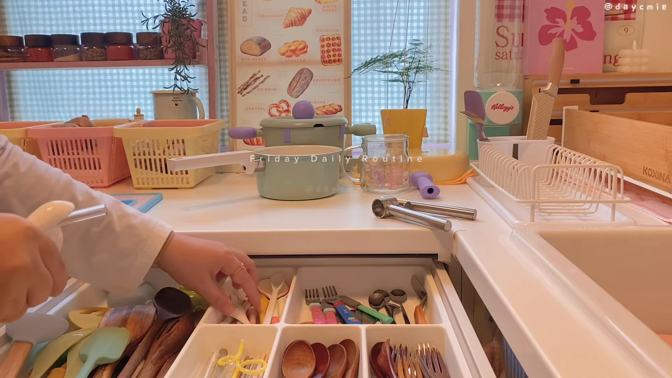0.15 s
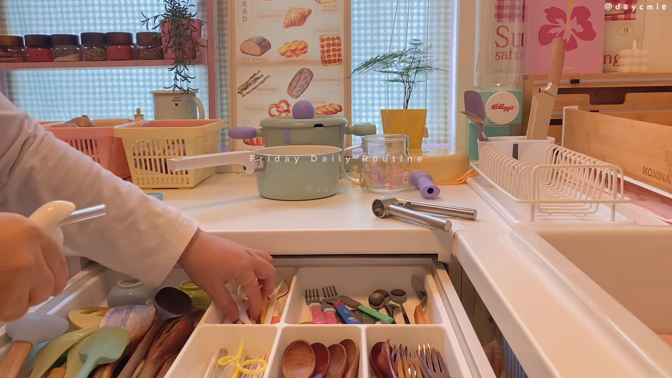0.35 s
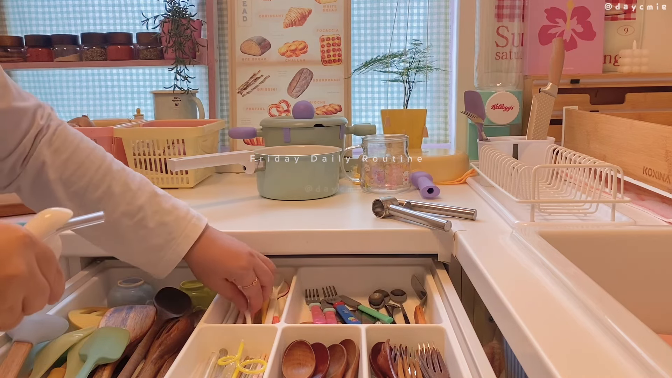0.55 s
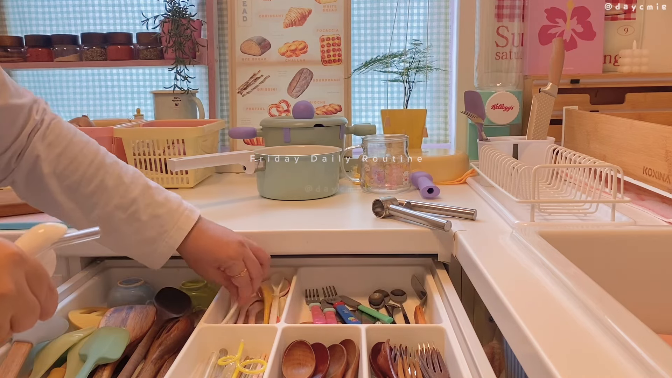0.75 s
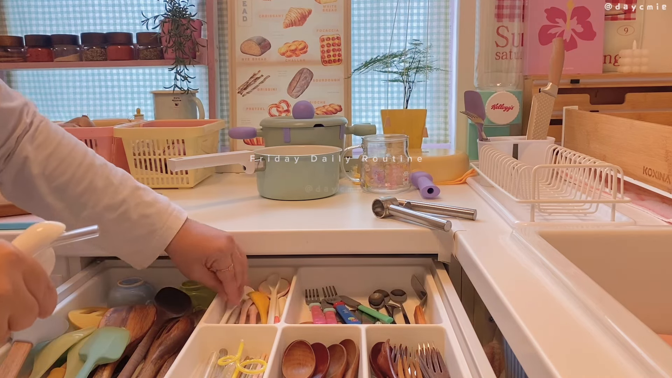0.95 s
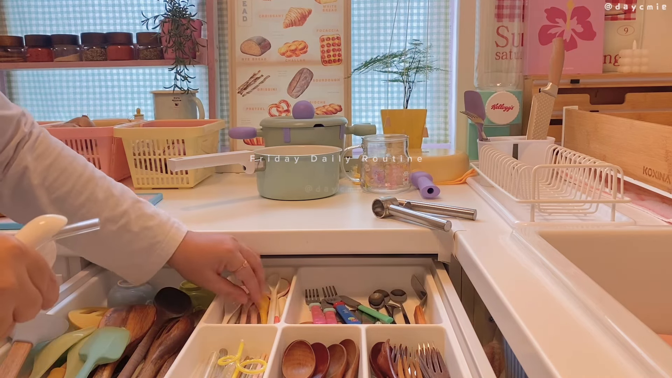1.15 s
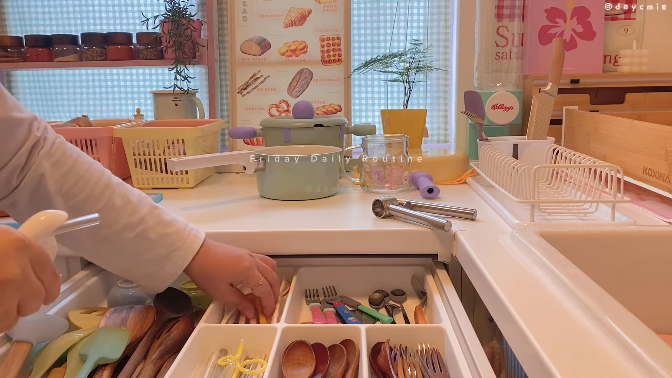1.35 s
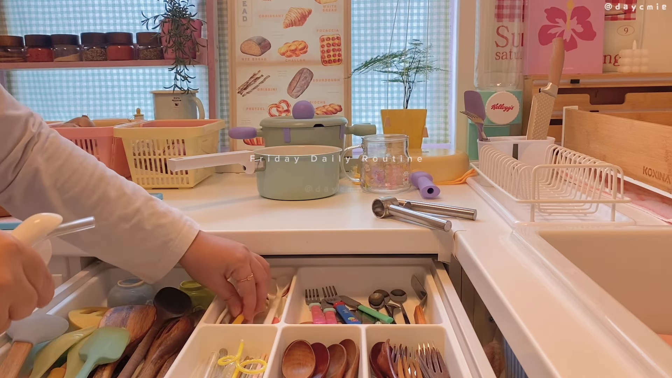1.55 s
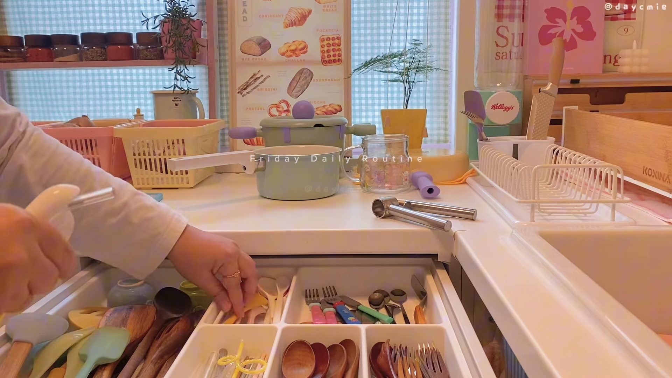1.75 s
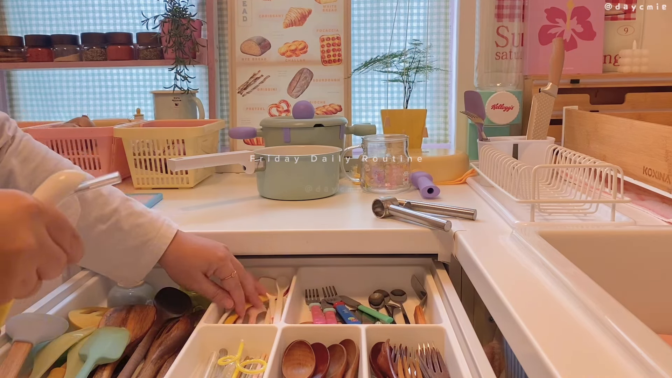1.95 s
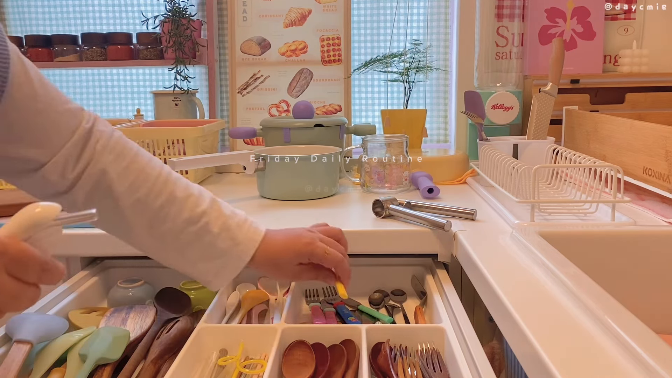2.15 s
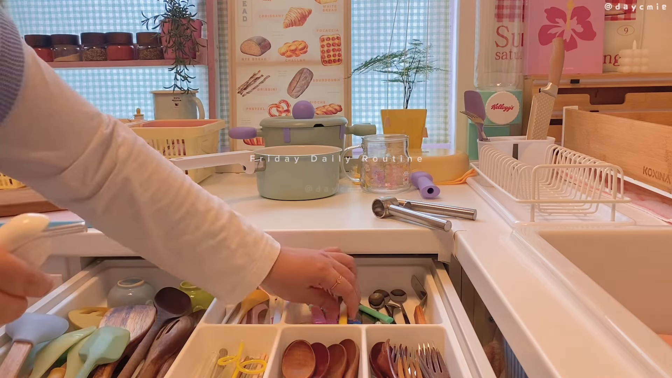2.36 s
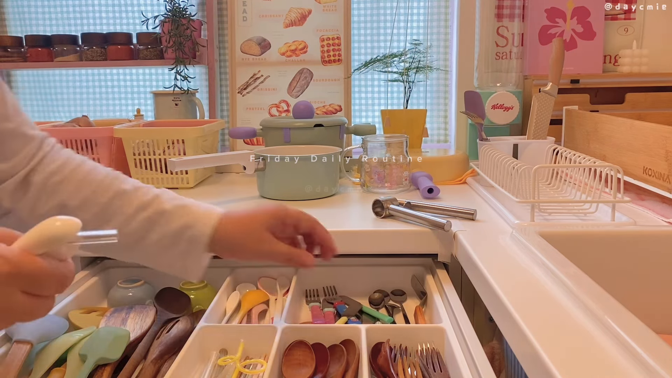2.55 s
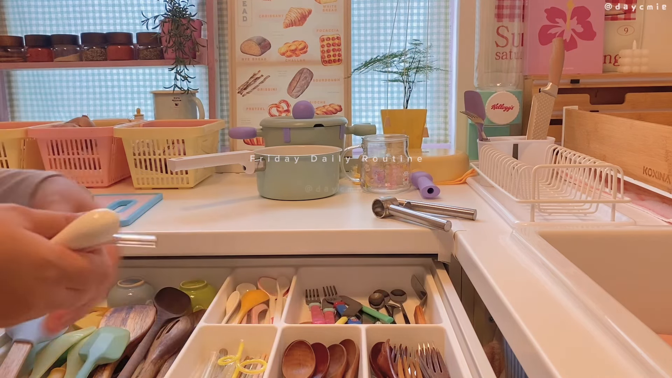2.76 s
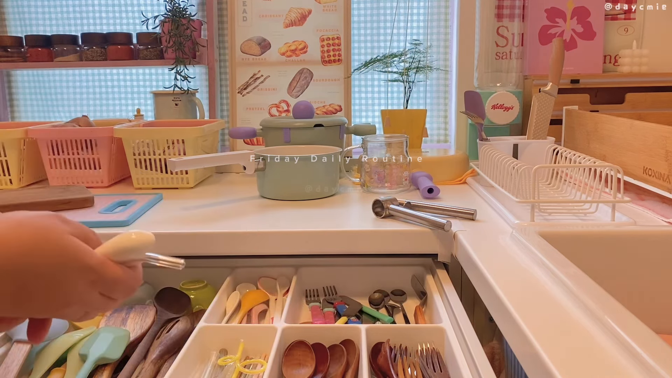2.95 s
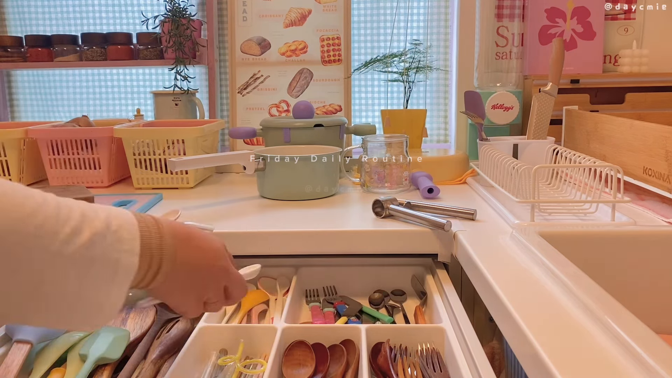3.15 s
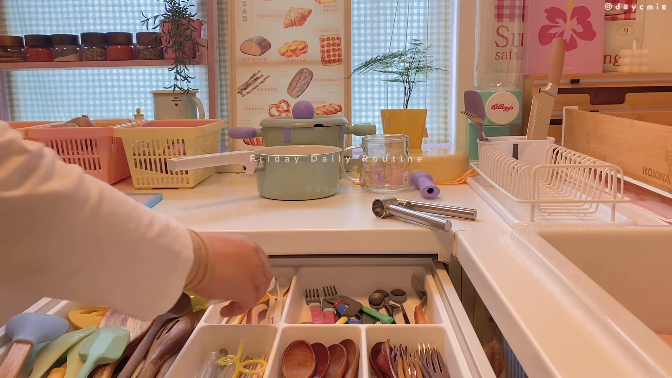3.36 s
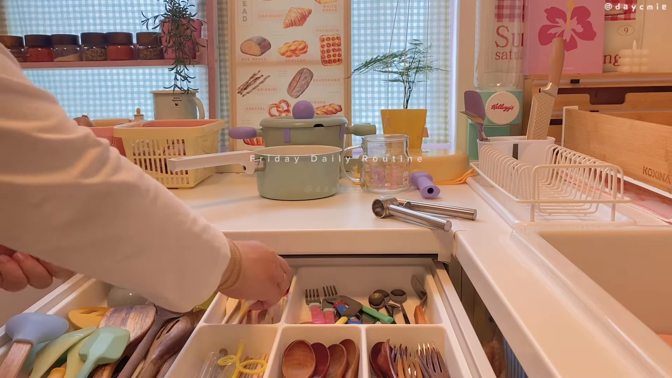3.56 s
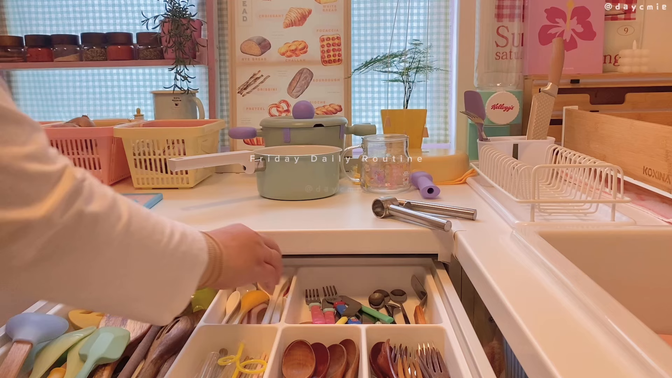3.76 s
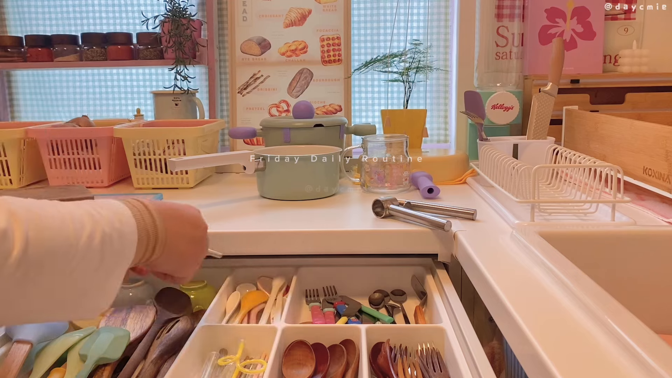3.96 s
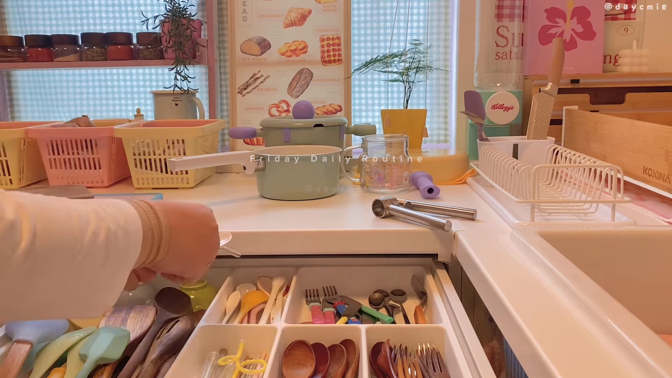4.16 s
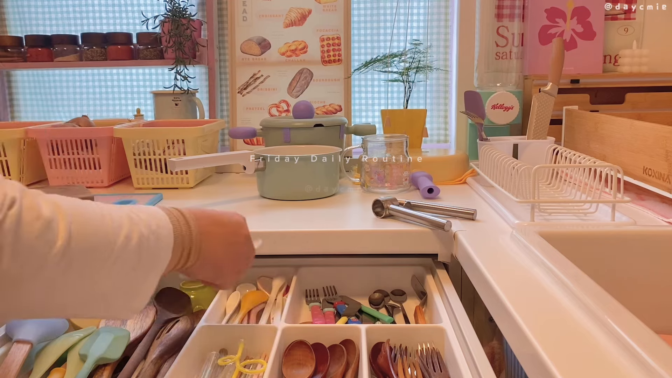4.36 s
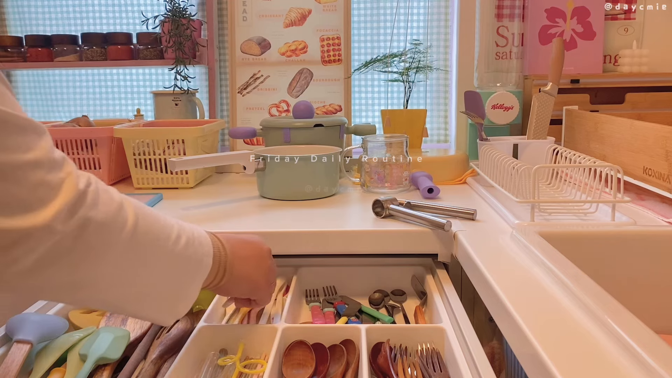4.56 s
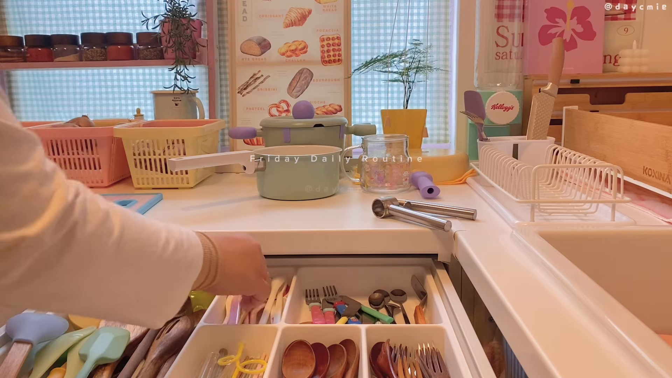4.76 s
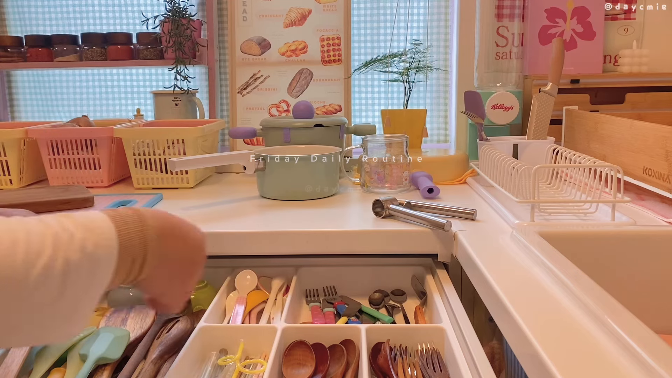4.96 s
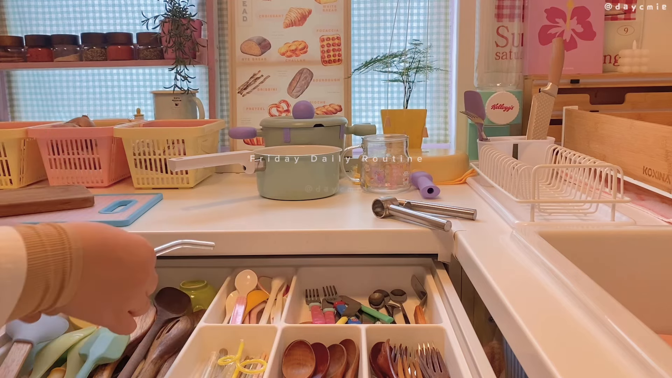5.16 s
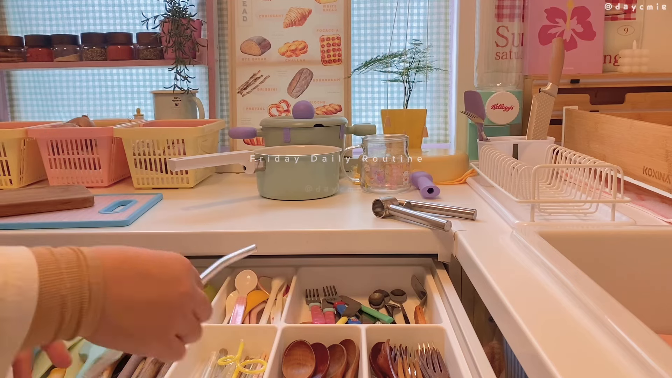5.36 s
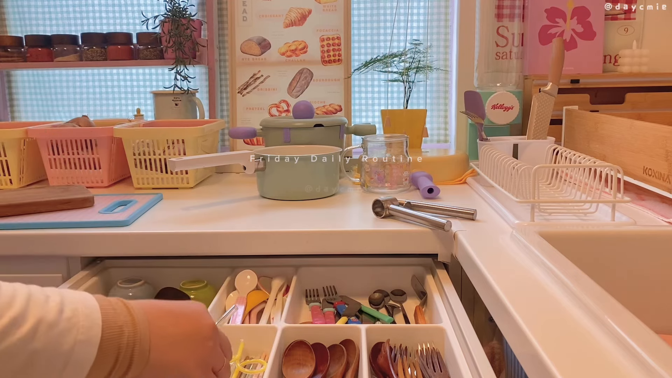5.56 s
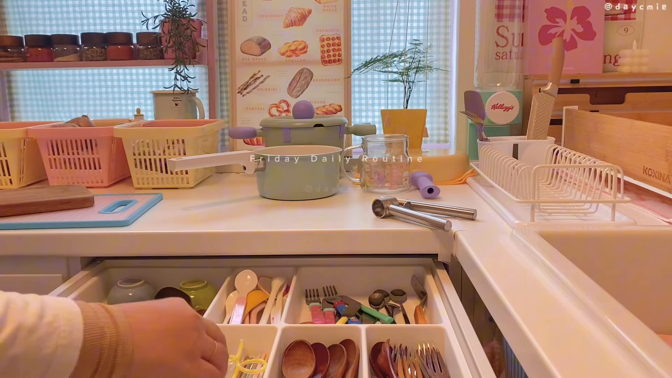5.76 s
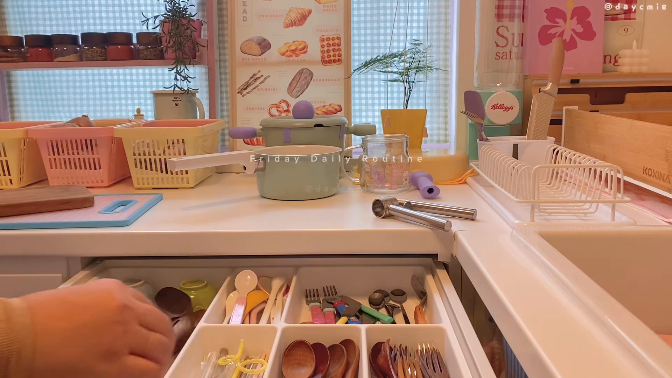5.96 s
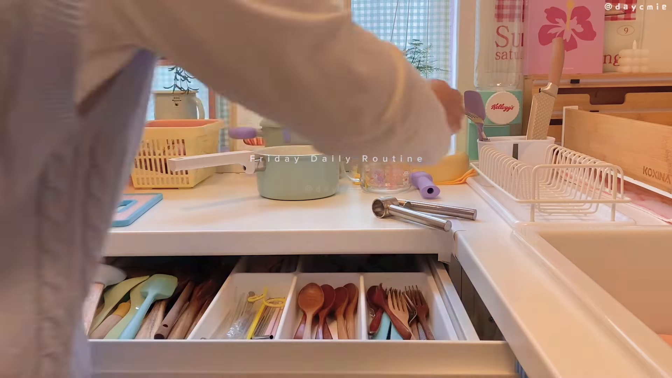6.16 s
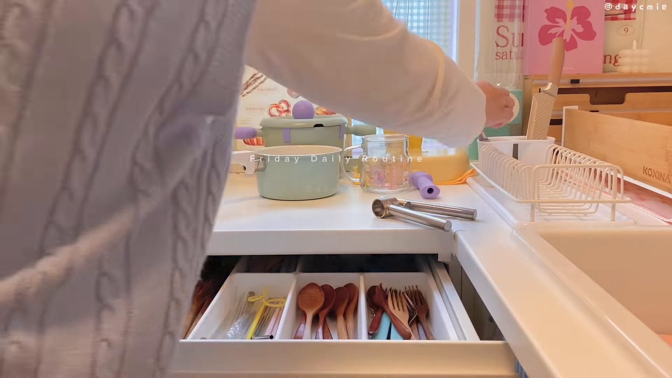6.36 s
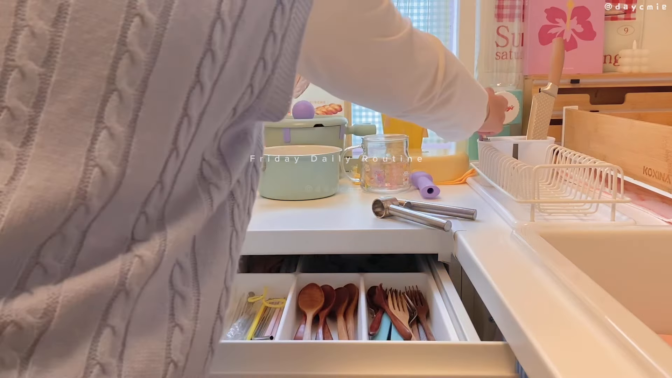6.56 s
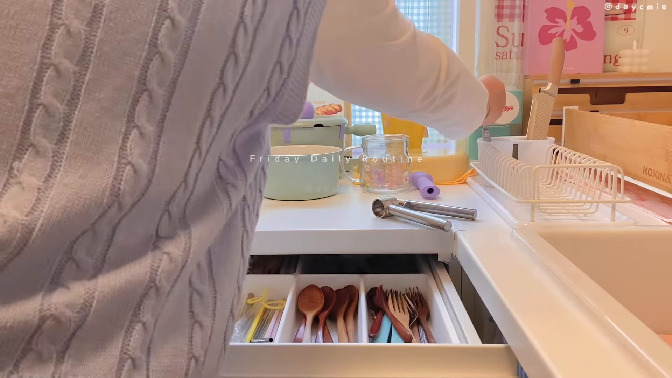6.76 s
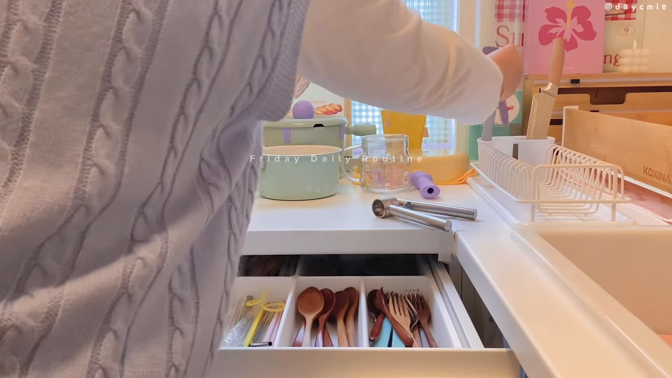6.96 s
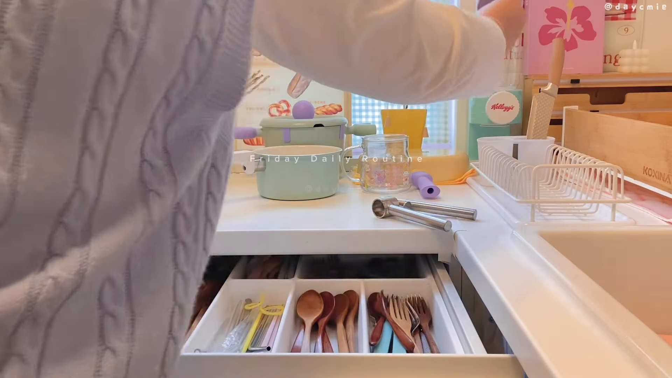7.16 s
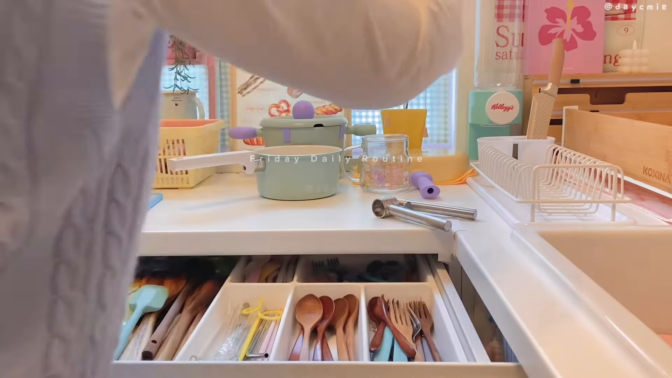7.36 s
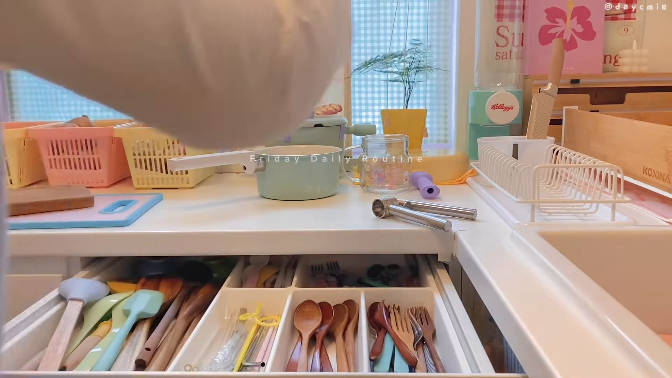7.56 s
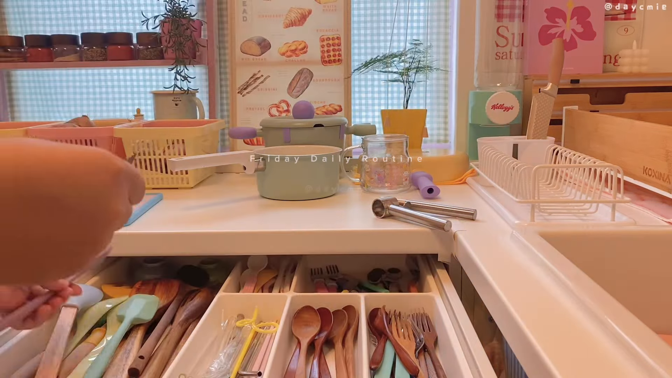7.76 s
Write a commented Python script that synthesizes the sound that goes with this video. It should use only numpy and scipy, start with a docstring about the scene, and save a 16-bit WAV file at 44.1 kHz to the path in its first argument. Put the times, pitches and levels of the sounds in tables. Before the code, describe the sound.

Close stereo pickup in a small hard kitchen: steel cutlery is sorted into a plastic drawer tray, with dense bright clinks and dull tray thuds at first, then separate short clatters with pauses between. Near the end a knife knocks several times against a hollow wooden block. Quiet air, a fuzzy low motor hum and faint counter thumps lie beneath.

```python
"""Steel clinks over tray thuds and loose rattle come first: cutlery sorted into a plastic drawer tray.
Each blow is shaped noise through resonances, and sparse echoes give it a small hard kitchen.
Filtered noise makes the steady air, motor hum and rumble beneath, the counter thumps and later rustle.
Near the end a knife knocks into a wooden block, built of dying sines under a dull noise tick.
Three times the ringing and its echo stop short. A stereo pair of microphones stands close by."""
import sys
import numpy as np
from scipy import signal
from scipy.fft import rfft, irfft
from scipy.io import wavfile
from scipy.ndimage import uniform_filter1d

SR = 44100
rng = np.random.default_rng(int(sys.argv[2]) if len(sys.argv) > 2 else 0)


def wav_record(signal):
    """Record a signal, one row per channel, as 16-bit PCM in the file named by sys.argv[1]."""
    frames = np.transpose(np.atleast_2d(signal))
    bounded = np.clip(frames, -1, 1)
    # unit amplitude maps onto the largest positive 16-bit level
    quanta = np.round(bounded * 32767).astype(np.int16)
    wavfile.write(sys.argv[1], SR, quanta)


N = 344421  # samples

# Blows of steel on steel: start_s, steel_level_db, thud_level_db, thud_pitch_hz
BLOWS = [(0.0, -33, -49, 992), (0.0527, -49, -35.5, 560), (0.078, -62, -33.5, 450), (0.107, -40, -51, 470),
         (0.212, -52, -44.5, 298), (0.3095, -46, -43.5, 1190), (0.353, -30, -44.5, 1150),
         (0.3667, -25, -33.5, 670), (0.382, -17.5, -31, 720), (0.3947, -10.5, -30.5, 290),
         (0.5382, -23, -29.5, 432), (0.614, -20, -38.5, 1320), (0.685, -32, -43, 636),
         (0.7785, -19, -38, 980), (0.8602, -16, -32, 1140), (0.881, -8.5, -22, 370),
         (0.9195, -16.5, -29, 1110), (0.9832, -20.5, -34, 1010), (1.078, -34.5, -37.5, 1010),
         (1.2365, -34, -40, 1080), (1.2602, -20, -35.5, 1250), (1.2888, -22.5, -26, 1180),
         (1.3909, -6.5, -18.5, 315), (1.4515, -13, -27.5, 1010), (1.4895, -20.5, -27.5, 1040),
         (1.5241, -20, -30, 1180), (1.5847, -19, -29, 1060), (1.6383, -12.5, -24, 1050),
         (1.7123, -18.5, -27, 1140), (1.7299, -27, -23, 1230), (1.746, -14, -27.5, 1090),
         (1.7745, -16.5, -27, 590), (1.875, -22, -31.5, 1150), (1.885, -18, -28, 1120),
         (2.3735, -20, -22, 787), (2.409, -24.5, -28, 1110), (2.7463, -37, -65, 248),
         (2.857, -43, -55, 250), (2.9238, -26, -58, 322), (2.9389, -26, -55, 276),
         (3.1264, -49.5, -67, 242), (3.5363, -25.5, -34.5, 1290), (3.5894, -14, -27, 1190),
         (3.6283, -24.5, -22, 800), (3.677, -12.5, -43, 1210), (3.7006, -12, -17, 596.5),
         (3.7193, -16.5, -35.5, 980), (3.7594, -14.5, -30.5, 1240), (3.7996, -20.5, -38.5, 1310),
         (3.987, -37, -57, 283), (4.6593, -25.5, -33.5, 1000), (4.682, -18.5, -36, 1100),
         (4.696, -10, -20, 1200), (4.7477, -28, -29, 1320), (4.8277, -26, -37.5, 245),
         (4.8707, -30.5, -39.5, 1310), (5.5892, -18, -35, 1120), (5.6554, -6, -23.5, 1270),
         (5.6684, -22.5, -37, 845), (5.7466, -12.5, -25, 810)]
# Piece in hand from each moment on: start_s, ring_t60_s, ring_level_db (within the blow),
# modes as a list of pitch_hz, width_hz, level_db
PIECES = [(0, 0.12, -10.5, [(5154, 60, 7), (9530, 130, -4), (14400, 120, -9)]),
          (.75, 0.094, -10.5, [(5970, 130, -1), (9390, 100, 0), (10540, 48, -22), (14160, 100, 1.5)]),
          (1.2, 0.1, -11, [(5220, 77, -5.5), (6500, 62, -10), (9100, 73, -9), (9440, 41, 0.5),
          (14660, 250, -9)]), (2.7, 0.037, 3.5, [(4000, 730, -15.5), (4780, 580, -11.5), (5750, 250, -1),
          (6150, 140, -6.5), (8050, 110, -3.5), (9410, 120, -6), (13700, 200, -16)]),
          (3.4, 0.21, -5, [(2840, 79, -16), (3670, 70, -10.5), (5050, 70, -15.5), (5710, 55, -0.5),
          (8250, 76, 2.5), (9180, 47, 1), (12920, 52, -7), (13850, 50, 2), (14460, 50, -4)]),
          (3.95, 0.046, 7.5, [(4000, 600, -23.5), (5850, 93, -4), (7850, 100, 4)]),
          (4.5, 0.14, -9.5, [(3500, 90, -14), (5263, 75, -5), (6020, 260, -6.5), (9750, 170, 0),
          (14420, 91, -2), (14980, 85, -2)]), (5.4, 0.15, -6.5, [(2280, 186, -8), (3089, 69, -4),
          (4560, 180, -4), (5460, 55, -3.5), (5724, 108, 5.3), (8360, 96, -14), (9030, 55, -1),
          (10310, 115, 0), (13720, 41, 5), (13800, 50, 0), (15250, 67, -2)])]
# Relative spectrum of the steel click: frequency_hz, level_db (per Hz)
CLICK_SPECTRUM = [(1200, -37.5), (2200, -7.5), (3200, -12.5), (5800, -4), (7400, -5.5), (9600, -3.5),
                  (12300, -9.5), (14700, -8), (15500, -9.5), (16000, -30.5)]
# Resonances of the plastic tray: pitch_hz, width_hz, level_db
TRAY_MODES = [(259.4, 85, -4.5), (540, 290, -5.5), (1090, 650, -0.5), (2010, 4000, -11.5)]
# Loose pieces shifting in the tray: full_level_s, hold_s, level_db
RATTLES = [(0.0, 1.75, -73.5), (1.82, 0.068, -50.5), (3.732, 0.045, -33), (4.8, 0.055, -58.5),
           (5.77, 0.17, -57)]
# Knife against the block: start_s, tock_level_db, tick_level_db
KNOCKS = [(6.618, -32, -65.5), (6.703, -23, -36), (6.719, -30, -42), (6.824, -30, -42), (6.878, -38.5, -52),
          (6.894, -36.5, -49), (6.933, -35, -43)]
# Modes of the wooden block: pitch_hz, level_db, t60_s
BLOCK_MODES = [(502, -10, 0.058), (908, -3, 0.11), (967, 3.5, 0.047), (1050, -1.5, 0.029),
               (1294, -4, 0.038), (1613, -11.5, 0.04), (2040, -7, 0.012)]
# Moments at which blows, swells and echoes break off: stop_s
STOPS = [2.0, 3.103, 6.032]
# Reverberation of the kitchen: frequency_hz, t60_s
KITCHEN_DECAY = [(200, 0.36), (1000, 0.3), (4000, 0.38), (9000, 0.31), (15000, 0.088)]
# Relative spectrum of the room air: frequency_hz, level_db (per Hz)
AIR_SPECTRUM = [(12, -46.5), (20, -50), (98, -1), (127, -14), (234, -5.5), (319, -19), (347, -14.5),
                (446, -12.5), (527, -19.5), (738, -19), (1260, -25.5), (1530, -27.5), (11000, -64),
                (16000, -70.5)]
# Left-right likeness of the air: frequency_hz, correlation (-1 to 1)
AIR_LIKENESS = [(60, 0.83), (240, 0.86), (950, -0.35), (3770, 0.2), (15000, -0.68)]
# Left-right balance of the air: frequency_hz, left_over_right_db
AIR_BALANCE = [(60, -14.5), (240, 0), (950, 0), (3770, 1), (15000, 4.5)]
# Thumps through the counter: peak_s, level_db
THUMPS = [(0.69, -52), (0.82, -59), (1.37, -52.5), (1.519, -40.5), (1.671, -53), (1.87, -49), (1.97, -45.5),
          (2.15, -40), (2.41, -55), (3.411, -53.5), (4.36, -47.5), (4.52, -44.5), (6.73, -37.5)]
# Sleeve and drawer rustle: full_level_s, hold_s, level_db
RUSTLES = [(6.17, .02, -72), (6.3, 0.19, -78.5), (6.8, .1, -74.5), (7.25, .02, -79.5), (7.58, .02, -73)]
# Phase between the microphone ports: frequency_hz, left_lead_rad
PORT_LEAD = [(0, 0), (2670, 1.5), (4570, 1.2), (8000, 2.4), (9820, .1), (10600, -.5), (11300, -3.1),
             (13200, -3.2), (13900, -6.1), (14800, -6.6), (15600, -8.6)]
# Likeness of the microphone ports: frequency_hz, correlation (0 to 1)
PORT_LIKENESS = [(200, 0.78), (1000, 0.65), (3000, 0.68), (6000, 0.21), (9000, 0.63), (13000, 0.97)]

UNEVEN_DB = 4  # spread of mode levels, as each blow lands elsewhere
NEIGHBOURS_DB = -17.5  # pieces lying beside the struck one, before a random 0 to 10 dB
RATTLE_RISE_DB_PER_S, RATTLE_FALL_DB_PER_S = 251.5, 114
AIR_DB = -51
HUM_HZ, HUM_WIDTH_HZ, HUM_DB = 102.6, 14, -54.5
RUMBLE_DB = -66.5  # steady lows between the thumps
THUMP_RISE_DB_PER_S, THUMP_FALL_DB_PER_S = 203, 201
RUSTLE_RISE_DB_PER_S, RUSTLE_FALL_DB_PER_S = 122, 92
EDGE_HZ = 16500  # upper band limit


def gain_of(db):
    """Level law: amplitude gain is ten to the power of decibels over twenty."""
    return 10 ** (np.asarray(db) / 20)


def evened(x):
    """Power normalization: scales to rms 1 over all channels."""
    return x / np.sqrt(np.mean(x ** 2) + 1e-20)


def read(points, hz):
    """Interpolation of a spectrum table along a logarithmic frequency axis."""
    f, value = np.transpose(points)
    return np.interp(np.log(hz + 1), np.log(f + 1), value)


def coloured(x, db_at):
    """Linear filtering: each frequency is weighted by its own gain in dB."""
    hz = np.fft.rfftfreq(x.shape[-1], 1 / SR)
    return irfft(rfft(x) * gain_of(db_at(hz)), x.shape[-1])


def add(mix, start_s, sound):
    """Superposition: adds a sound into the mix from its start onward."""
    part = mix[:, round(start_s * SR):][:, :sound.shape[-1]]
    part += sound[:, :part.shape[-1]]


def pair(length, likeness):
    """Partial correlation: two noises share a common part set by their likeness."""
    a, b = rng.standard_normal((2, length))
    return np.array([a, likeness * a + np.sqrt(1 - likeness ** 2) * b])


def burst(t, rise_s, t60_s):
    """Transient envelope: an exponential approach followed by exponential decay."""
    return (1 - np.exp(-t / rise_s)) * gain_of(-60 * t / t60_s)


def next_stop(s):
    """Truncation: the moment at which a sound timed at s breaks off."""
    return min(stop for stop in STOPS + [N / SR] if stop > s)


def swells(rows, rise_db_per_s, fall_db_per_s):
    """Exponential growth and decay: gains rise to their level, hold it and die away."""
    t = np.arange(N) / SR
    total = 0
    for full_s, hold_s, level_db in rows:
        rise_db = rise_db_per_s * np.maximum(full_s - t, 0)
        fall_db = fall_db_per_s * np.maximum(t - full_s - hold_s, 0)
        total = total + gain_of(level_db - rise_db - fall_db) * (t < next_stop(full_s))
    return total


def body(modes, length):
    """Modal resonance: two unrelated noises excite the modes of an object, rms 1."""
    hz = np.fft.rfftfreq(length, 1 / SR)
    power = sum(gain_of(2 * db) / (1 + (2 * (hz - f) / width) ** 2) ** 2 for f, width, db in modes)
    noise = rng.standard_normal((2, length))
    return evened(irfft(rfft(noise) * np.sqrt(power), length))


def chatter(t, per_s, spread_db):
    """Repeated impact: small random rebounds, each decaying in a few ms, on a steady floor."""
    hit, size = rng.random((len(t), 2)).T
    contacts = (hit < per_s / SR) * gain_of(spread_db * -np.log(size + 1e-3))
    rebounds = signal.lfilter([1], [1, -np.exp(-1 / (0.0048 * SR))], contacts)
    return evened(1.9 + rebounds)


def struck_modes(modes):
    """Modal excitation: the struck piece wakes unevenly, with 18 random neighbouring modes."""
    uneven = rng.standard_normal(len(modes))
    struck = [(f, width, db + UNEVEN_DB * u) for (f, width, db), u in zip(modes, uneven)]
    beside = [(2800 * 5.4 ** u, 70 + 160 * v, 10 * w + NEIGHBOURS_DB) for u, v, w in rng.random((18, 3))]
    return struck + beside


def clinks():
    """Impact: each blow sums a crack, a chattering click, the steel's modal ring and a tray thud."""
    out, t = np.zeros((2, N)), np.arange(12000) / SR
    for start_s, steel_db, thud_db, thud_hz in BLOWS:
        t60_s, ring_db, modes = [piece[1:] for piece in PIECES if piece[0] <= start_s][-1]
        shake = chatter(t, per_s=220., spread_db=1.5)
        noise = evened(coloured(pair(len(t), 0), lambda f: read(CLICK_SPECTRUM, f)))
        click = noise * gain_of(-10) * burst(t, .0012, .08) * shake
        crack = noise * gain_of(-8) * burst(t, .0003, .015)
        steel = body(struck_modes(modes), len(t)) * gain_of(ring_db) * burst(t, 0.0019, t60_s)
        thud_envelope = burst(t, 0.00085, 0.045) + 0.79 * burst(t, .003, 0.076) * shake
        thud = body(TRAY_MODES + [(thud_hz, 160., 5.)], len(t)) * thud_envelope
        blow = gain_of(steel_db) * (crack + click + steel) + gain_of(thud_db) * thud
        add(out, start_s, blow * (start_s + t < next_stop(start_s)))
    return out


def rattle():
    """Random impact train: many tiny contacts, a few larger, shake the steel and the tray."""
    contact = rng.random(N) < 250 / SR  # 250 per second on average
    size = gain_of(1.3 * np.minimum(rng.exponential(1, N), 4)) * contact
    shake = signal.lfilter([1], [1, -np.exp(-1 / (0.0057 * SR))], size) + 0.42
    steel = evened(coloured(pair(N, 0), lambda f: read(CLICK_SPECTRUM, f)) * shake)
    tray = evened(body(TRAY_MODES, N) * shake)
    return gain_of(-3.5) * (steel + tray) * swells(RATTLES, RATTLE_RISE_DB_PER_S, RATTLE_FALL_DB_PER_S)


def kitchen(x, wet_db):
    """Reverberation: sparse echoes decay at each band's own rate; three patterns take turns."""
    out = np.zeros((2, N))
    edges = [0] + [round(s * SR) for s in STOPS] + [N]
    turn = np.arange(N) / SR * 2.5
    for k in range(3):
        # one echo of random sign in every 20 samples
        taps = np.zeros((2, SR))
        at = np.arange(200, SR - 20, 20) + rng.integers(0, 20, (2, (SR - 201) // 20))
        np.put_along_axis(taps, at, rng.choice([-1., 1.], at.shape), 1)
        hz, t, z = signal.stft(taps, SR, nperseg=256)
        decay = gain_of(-60 * t / read(KITCHEN_DECAY, hz)[:, None])
        tail = signal.istft(z * decay, SR, nperseg=256)[1]
        tail = tail / np.linalg.norm(tail[0])
        fed = x * np.cos(np.pi * (turn + k / 3)) * np.sqrt(2 / 3)
        # no echo crosses a stop
        for a, b in zip(edges, edges[1:]):
            out[:, a:b] += signal.fftconvolve(fed[:, a:b], tail, axes=1)[:, :b - a]
    return gain_of(wet_db) * out


def ports(x):
    """Interchannel coherence: the right port hears the left phase-shifted, plus an unrelated share."""
    hz, (a, b) = np.fft.rfftfreq(N, 1 / SR), rfft(x)
    f, lead = np.transpose(PORT_LEAD)
    likeness = np.clip(read(PORT_LIKENESS, hz), 0, 1)
    shifted = np.exp(-1j * np.interp(hz, f, lead)) * a
    return irfft([a, likeness * shifted + np.sqrt(1 - likeness ** 2) * b], N)


def air():
    """Stationary noise: room air with drifting spectral patches and frequency-dependent coherence."""
    frames, hz = N // 512 + 5, np.fft.rfftfreq(2048, 1 / SR)
    a, b, c, d, patches = rng.standard_normal((frames, 1025, 5)).T
    patches = uniform_filter1d(uniform_filter1d(patches, size=16, axis=0), size=8, axis=1)
    patches = evened(patches)
    likeness = np.clip(read(AIR_LIKENESS, hz), -1, 1)[:, None]
    half_balance = gain_of(read(AIR_BALANCE, hz)[:, None] / 2)
    left = a + 1j * b
    right = likeness * left + np.sqrt(1 - likeness ** 2) * (c + 1j * d)
    z = np.array([left * half_balance, right / half_balance])
    z *= gain_of(read(AIR_SPECTRUM, hz)[:, None] + 1.5 * patches)
    noise = signal.istft(z, nperseg=2048, noverlap=1536)[1][:, :N]
    return gain_of(AIR_DB) * evened(noise)


def hum():
    """Narrow-band noise: one resonance gives a fuzzy motor hum, identical in both channels."""
    def resonance_db(f):
        """Resonance curve: the level falls by 6 dB at half the width from the centre."""
        return -20 * np.log10(1 + (2 * (f - HUM_HZ) / HUM_WIDTH_HZ) ** 2)
    return gain_of(HUM_DB) * evened(coloured(pair(N, 1.0), resonance_db))


def rumble():
    """Structure-borne sound: lumpy lows and thumps through the counter, nearly alike left and right."""
    lows = evened(coloured(pair(N, .97), lambda f: -22 * np.log2((f + 1) / 58) ** 2))
    peaks = [(peak_s, 0, db) for peak_s, db in THUMPS]
    thumps = swells(peaks, THUMP_RISE_DB_PER_S, THUMP_FALL_DB_PER_S)
    return lows * (gain_of(RUMBLE_DB) + thumps)


def rustle():
    """Friction noise: the faint soft hiss of cloth and sliding, as broad-band noise."""
    hiss = evened(coloured(pair(N, 0.22), lambda f: -6.5 * np.log2((f + 1) / 3500) ** 2))
    return hiss * swells(RUSTLES, RUSTLE_RISE_DB_PER_S, RUSTLE_FALL_DB_PER_S)


def ring(modes, t, spread_db):
    """Free vibration: damped sines, unevenly excited, with unrelated phases left and right."""
    hz, db, t60_s = np.transpose(modes)[:, :, None]
    chance = rng.standard_normal((3, len(modes), 1))
    decay = gain_of(db + spread_db * chance[0] - 60 * t / t60_s)
    out = (decay * np.sin(2 * np.pi * hz * t + chance[1:])).sum(1)
    # scaled by the rms of the first 200 samples
    return out / np.sqrt(2 * np.mean(out[:, :200] ** 2))


def knocks():
    """Damped modal response: the hollow block rings briefly under a dull noise tick."""
    out, t = np.zeros((2, N)), np.arange(SR // 2) / SR
    for start_s, tock_db, tick_db in KNOCKS:
        tick = evened(coloured(pair(len(t), 0), lambda f: -4.5 * np.log2((f + 1) / 2500) ** 2))
        tick = tick * burst(t, 0.00048, 0.03)
        tock = ring(BLOCK_MODES, t, spread_db=2.) * np.minimum(t / .0015, 1)
        add(out, start_s, gain_of(tock_db) * tock + gain_of(tick_db) * tick)
    return out


def scene():
    """Superposition: blows and their echo are added to the air, hum, rumble and rustle."""
    blows = clinks() + rattle() + knocks()
    return ports(blows + kitchen(blows, wet_db=-4.5)) + air() + hum() + rumble() + rustle()


def record(dry):
    """Band limiting: a linear-phase low-pass filter removes the highest frequencies."""
    low_pass = signal.firwin(511, EDGE_HZ, window=("kaiser", 9), fs=SR)
    return signal.oaconvolve(dry, low_pass[None], "same")


dry = scene()
out = record(dry)
wav_record(out)
```